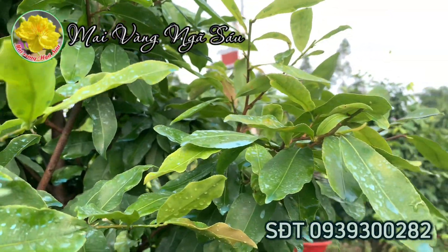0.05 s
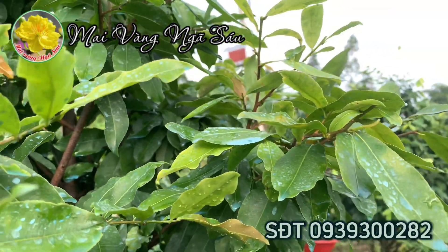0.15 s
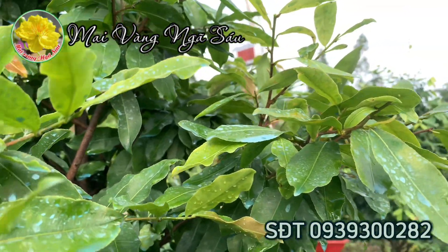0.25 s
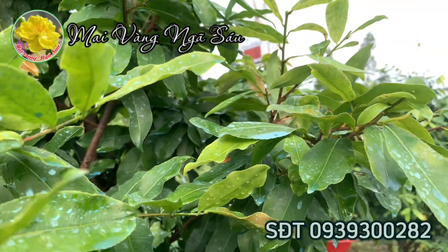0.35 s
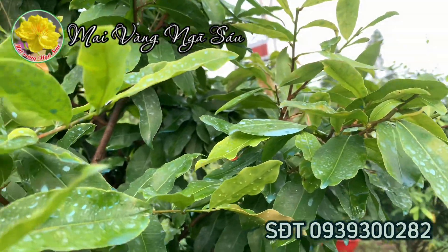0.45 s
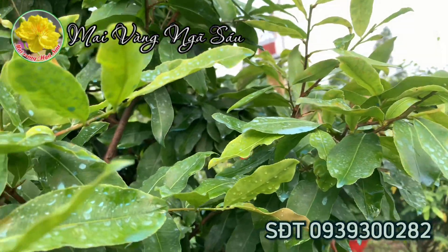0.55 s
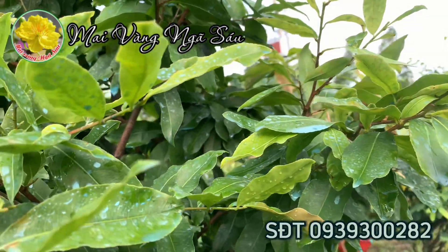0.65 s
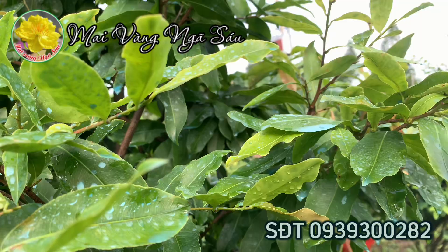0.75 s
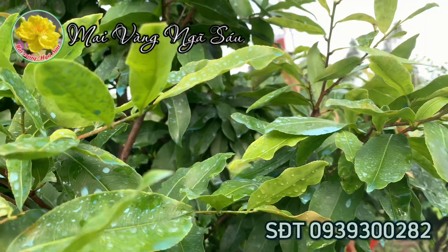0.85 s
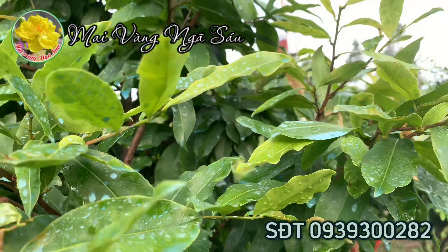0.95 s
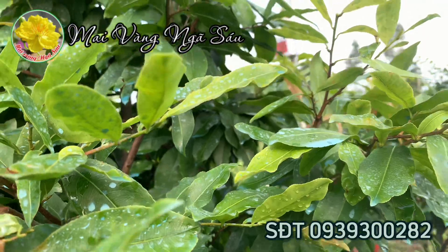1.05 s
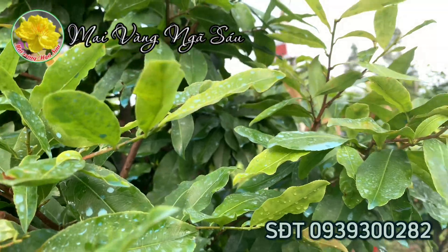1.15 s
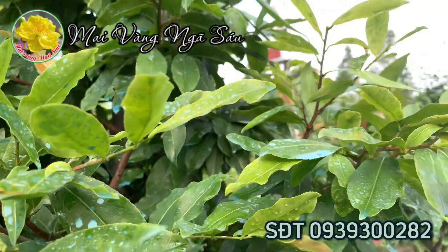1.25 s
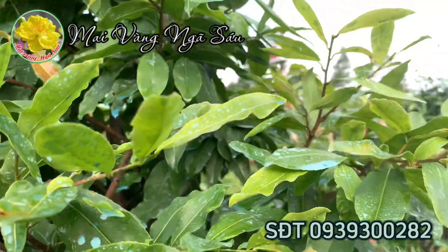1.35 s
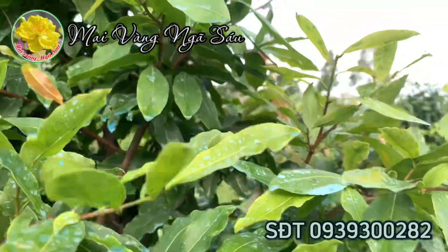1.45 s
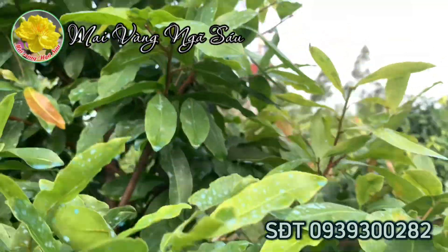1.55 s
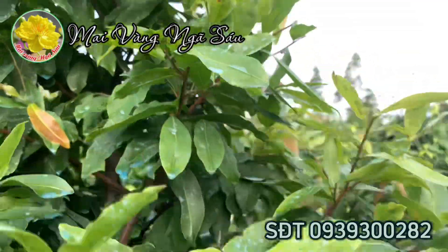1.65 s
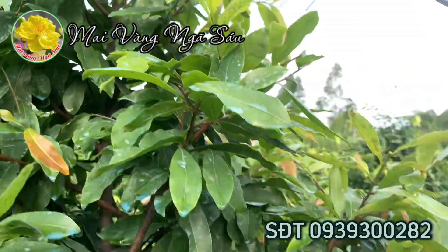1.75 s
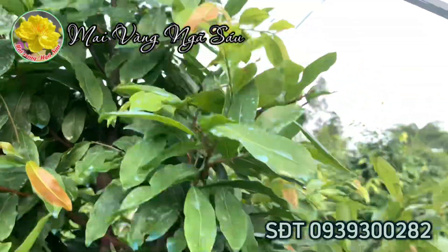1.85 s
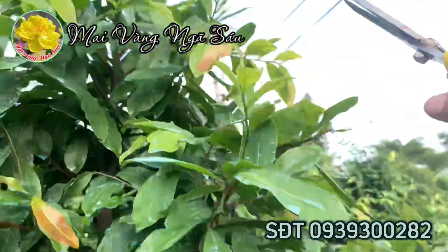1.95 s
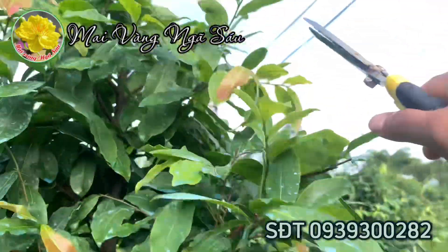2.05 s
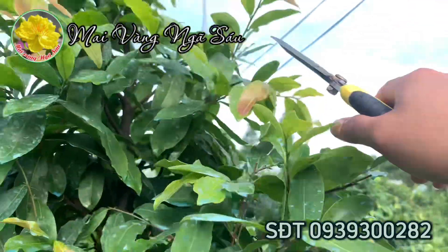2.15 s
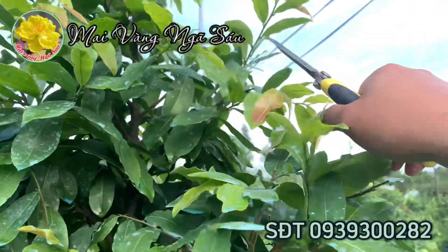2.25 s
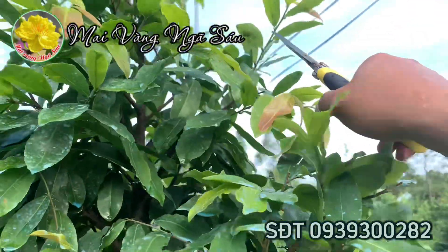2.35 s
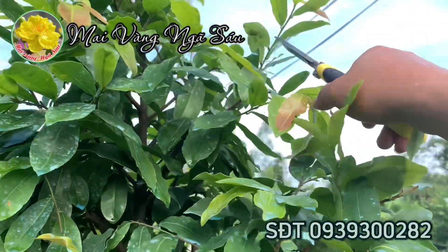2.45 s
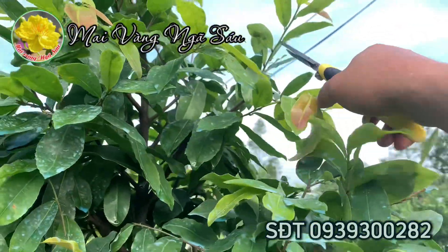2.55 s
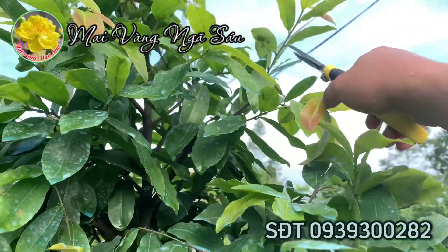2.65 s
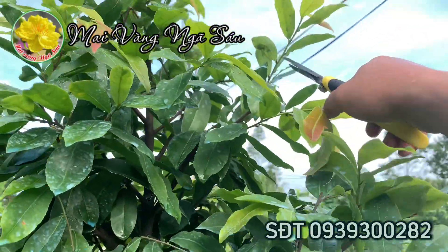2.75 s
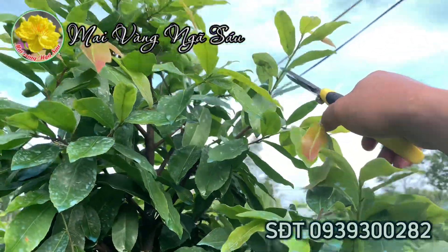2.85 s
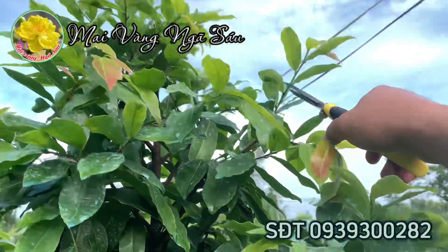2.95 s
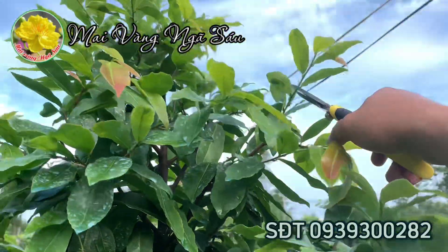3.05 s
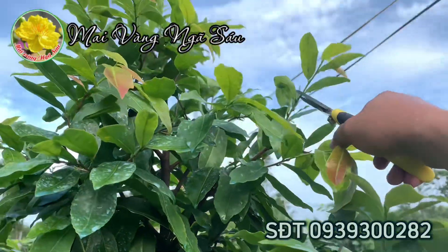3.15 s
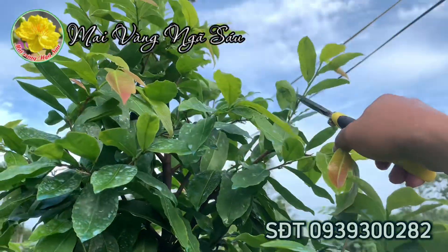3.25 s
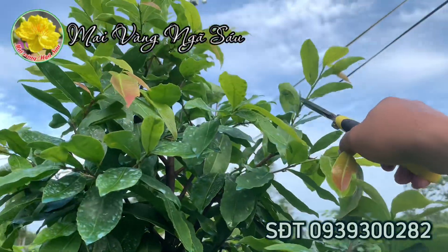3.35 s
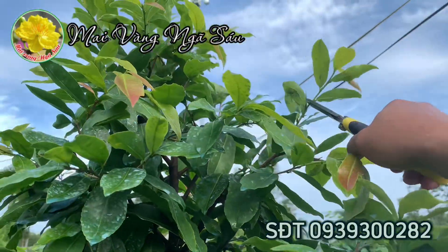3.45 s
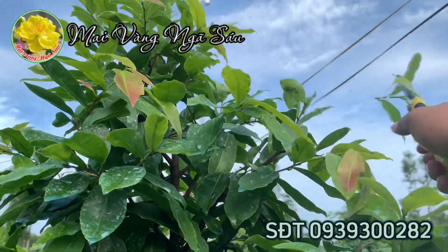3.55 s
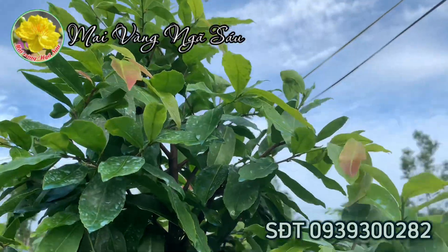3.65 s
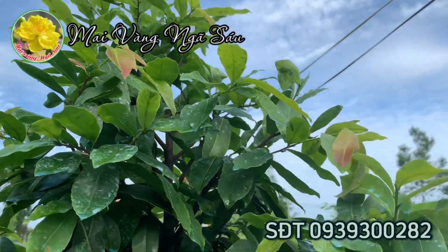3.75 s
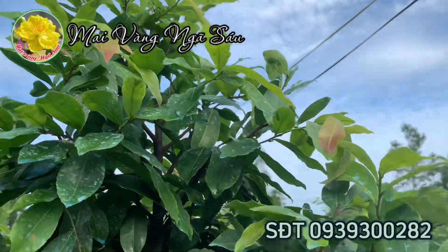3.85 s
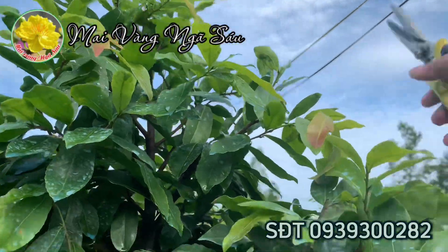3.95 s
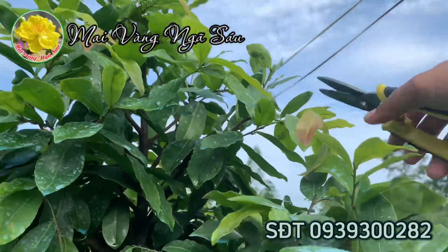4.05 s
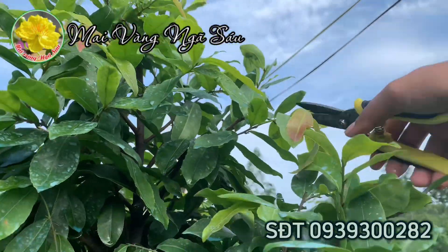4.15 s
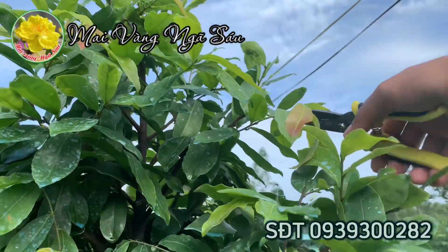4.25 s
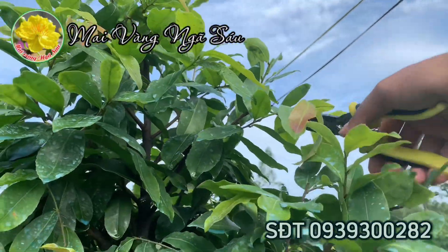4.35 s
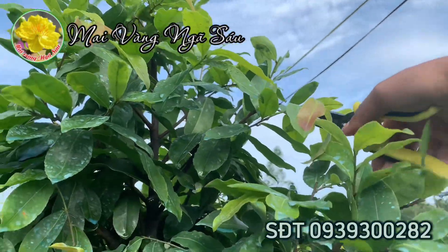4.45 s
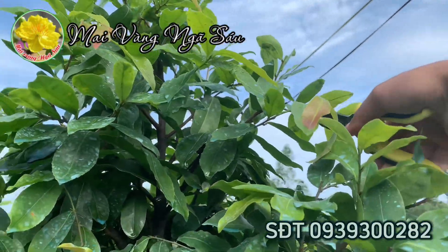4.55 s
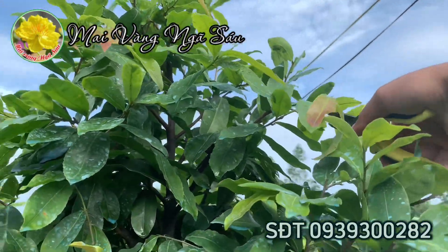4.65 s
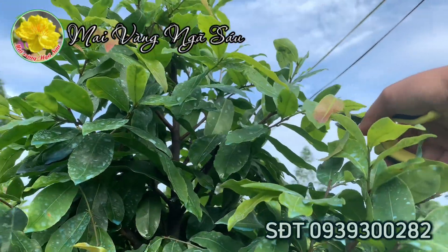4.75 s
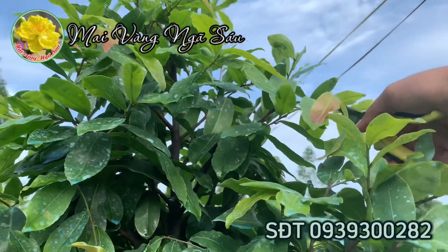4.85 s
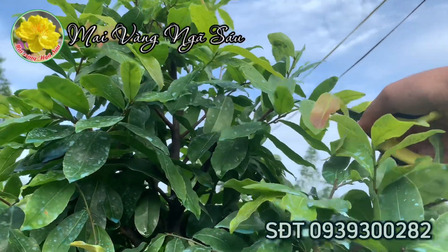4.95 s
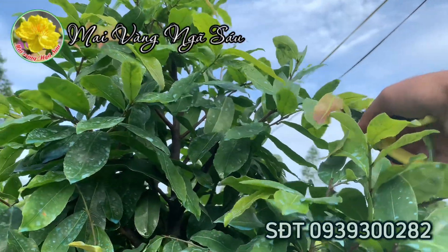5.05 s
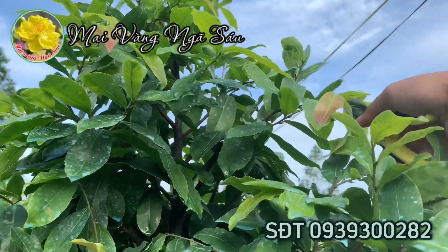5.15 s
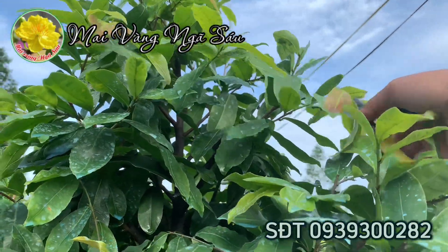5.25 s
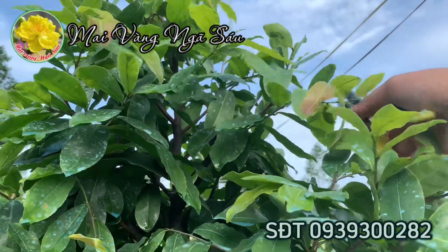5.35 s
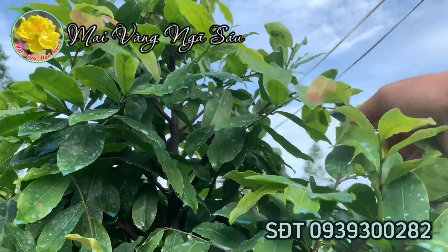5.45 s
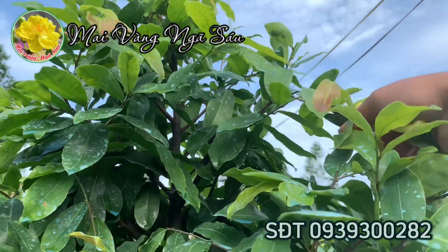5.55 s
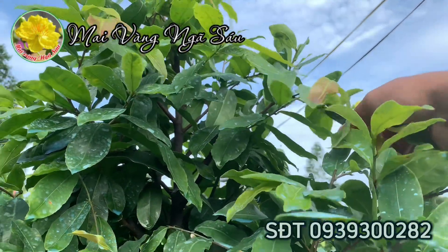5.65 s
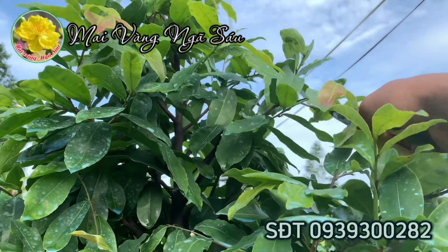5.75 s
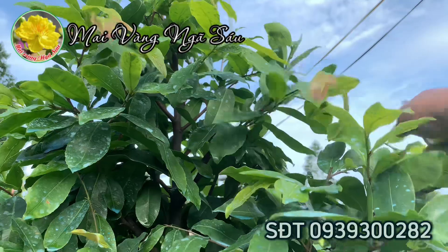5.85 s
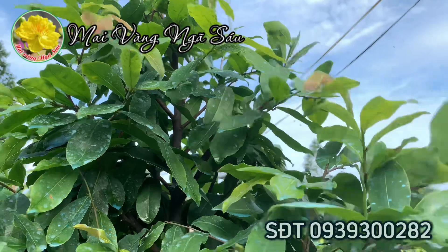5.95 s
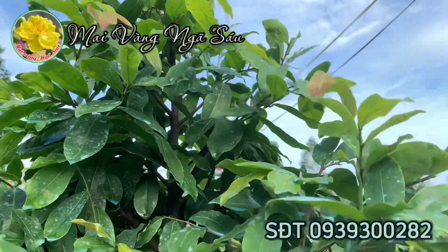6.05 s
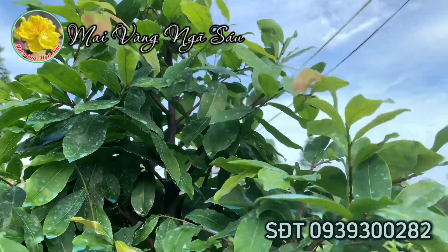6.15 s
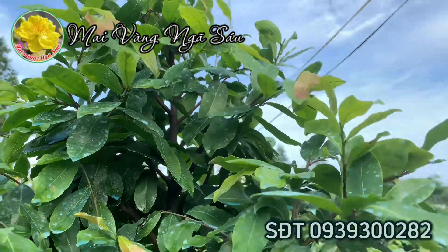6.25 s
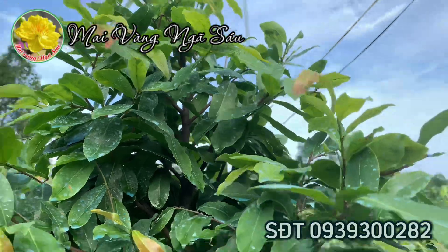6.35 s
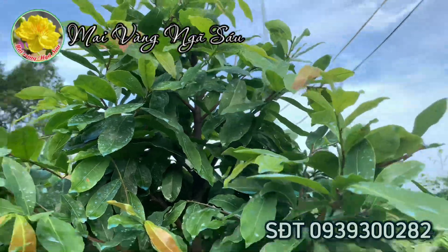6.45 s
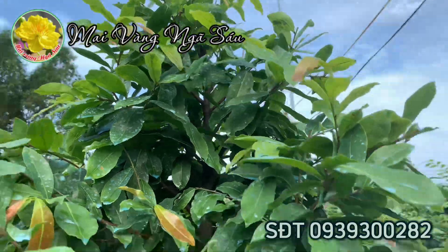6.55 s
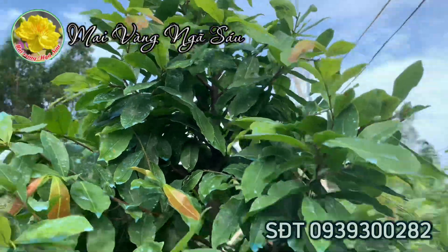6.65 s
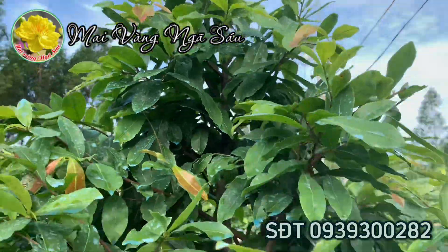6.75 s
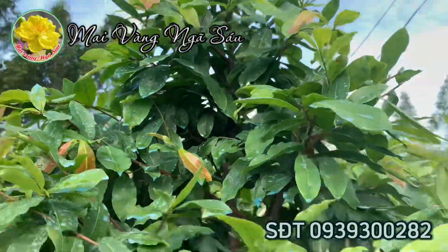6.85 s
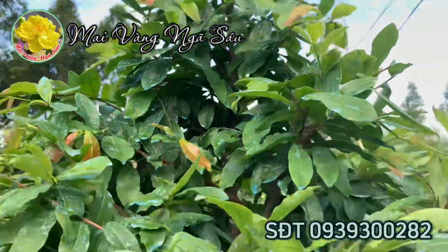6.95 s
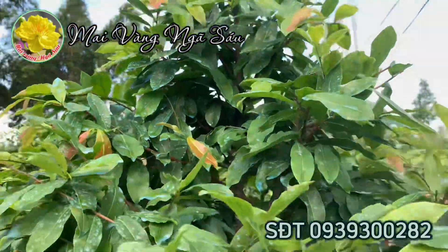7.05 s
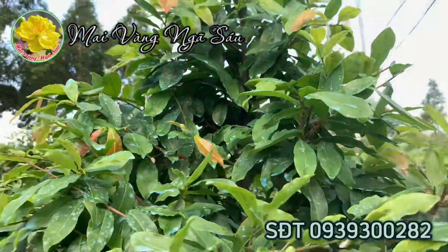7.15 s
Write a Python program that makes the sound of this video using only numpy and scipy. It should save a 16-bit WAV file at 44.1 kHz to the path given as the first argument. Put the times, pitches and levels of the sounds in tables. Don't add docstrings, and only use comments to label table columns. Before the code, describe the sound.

An open garden heard through a hand-held phone close to a tree. A shrill cicada, around six kilohertz, buzzes throughout, uneven at first, then fluttering about 23 times a second and swelling now and again; distant insects hiss and faint traffic rumbles low. At 0.5 s comes a faint snip and leaf brush, with soft low thuds at 0.9 and 1.1. Leaves rustle from 1.5 to 2.6, with a hard short bump at 1.8 and small ticks. A faint far frog throbs near 2.0, 2.8, 3.7 and 6.8. At 3.47 a loud, dry steel snip clacks shut with a tiny rattle. Crisp ticks return at 4.4. From 4.8 to 5.4 fingers rub and catch on the phone case, hollow and woody; the handle spring sings thinly before a second, softer snip at 5.78. Bumps, rustling and ticks follow, with a low thud at 6.65, twig knocks and bright snaps near 6.9.

```python
import sys
import numpy as np
from scipy import signal
from scipy.fft import rfft, irfft
from scipy.io import wavfile
from scipy.ndimage import uniform_filter1d, map_coordinates

SR = 44100
rng = np.random.default_rng(int(sys.argv[2]) if len(sys.argv) > 2 else 0)


def how_loud(loudness_db):
    steps = np.asarray(loudness_db, float) / 20
    return 10 ** steps


def generate_wav(signal):
    frames = np.transpose(np.atleast_2d(signal))
    scaled = np.clip(frames, -1, 1) * 32767
    pcm = np.round(scaled).astype(np.int16)
    wavfile.write(sys.argv[1], SR, pcm)


N = 316638
PORT_TURN_HZ = 5500


def evened(x):
    return x / np.sqrt(np.mean(x ** 2) + 1e-20)


def read(points, hz):
    f, value = np.transpose(points)
    return np.interp(np.log(hz + 1), np.log(f + 1), value, left=-90, right=-90)


def curves(rows, t):
    s, *columns = np.transpose(rows)
    return [np.interp(t, s, c) for c in columns]


def held(t, start, length, edge):
    inside = np.minimum(t - start, start + length - t)
    return np.sin(np.pi / 2 * np.clip(inside / edge + .5, 0, 1)) ** 2


def add(mix, s, sound):
    part = mix[..., round(s * SR):][..., :sound.shape[-1]]
    part += sound[..., :part.shape[-1]]


def drift(rate_hz, size):
    steps = rng.standard_normal(int(size * rate_hz / SR) + 4)
    coarse = np.arange(0, size + 32, 32)
    smooth = map_coordinates(steps, [coarse * rate_hz / SR], order=3)
    return evened(np.interp(np.arange(size), coarse, smooth))


def ring(x, hz, width):
    return signal.lfilter(*signal.iirpeak(hz, hz / width, SR), x)


def colour(x, points):
    hz = np.fft.rfftfreq(x.shape[-1], 1 / SR)
    return irfft(rfft(x) * how_loud(read(points, hz)), x.shape[-1])


def hollow(events, rise, sag):
    out, t = np.zeros(N), np.arange(SR // 2) / SR
    for s, db, hz, t60 in events:
        turn = 2 * np.pi * np.cumsum(hz * (1 + sag * np.exp(-t / 0.016))) / SR
        decay = how_loud(db - 60 * t / t60) * (1 - np.exp(-t / rise))
        add(out, s, np.sqrt(2) * decay * np.sin(turn))
    return out


# f/Hz, in phase, a quarter turn late
SIDE_LIKENESS = [(0, 0, .85), (600, 0, .65), (1500, -.1, .12), (4300, -.6, .1), (6500, -.5, .3),
                 (8000, 0, .5), (12000, 0, .55), (15000, -.1, .3)]


def likeness(hz, near=False):
    in_phase, quarter = curves(SIDE_LIKENESS, hz)
    like = in_phase - 1j * quarter * np.tanh(4 * np.sin(2 * np.pi * (hz + 300) / PORT_TURN_HZ))
    return .85 * like / np.hypot(in_phase, quarter) if near else like


def ports(mid, own, points):
    hz = np.fft.rfftfreq(len(mid), 1 / SR)
    side = likeness(hz, near=True) * rfft(mid) + .5 * rfft(own)
    side = irfft(side * how_loud(read(points, hz)), len(mid))
    return np.array([mid + side, mid - side])


def wash(spectra, side_db, patch_db, flicker_db, size):
    frames, hz = 4 * N // size + 5, np.fft.rfftfreq(size, 1 / SR)
    a, b, c, d, patches = rng.standard_normal((frames, len(hz), 5)).T
    patches = uniform_filter1d(uniform_filter1d(patches, size=10, axis=0), size=10, axis=1)
    patches = evened(patches)
    flicker = evened(uniform_filter1d(patches.mean(0), size=2))
    field = how_loud(patch_db * patches + flicker_db * flicker)
    like = likeness(hz)[:, None]
    shared, own = a + 1j * b, c + 1j * d
    z = np.array([shared, like * shared + np.sqrt(1 - abs(like) ** 2) * own])
    z = z * field * how_loud([read(s, hz) for s in spectra])[..., None]
    mid, side = signal.istft(z, nperseg=size, noverlap=3 * size // 4)[1][:, :N]
    mid, side = evened(mid), how_loud(side_db) * evened(side)
    return np.array([mid + side, mid - side])


# t/s, level/dB of the tenth overtone, level/dB of the eleventh over the tenth
CICADA_EFFORT = [(0, -58, -5), (.53, -65, 9), (.9, -62, -2.5), (1.15, -64.5, 9), (1.5, -65, 2),
                 (1.66, -58, -4), (2.05, -51.5, -10), (2.3, -57.5, -3.5), (3.42, -58.5, -3), (3.57, -52, 0),
                 (4.0, -55, 1.5), (4.4, -62, -3.5), (5.4, -57.5, -11), (5.76, -62, 0.5), (6.05, -53, -10.5),
                 (6.65, -60, 6), (6.84, -56.5, -10.5), (7.18, -60.5, -0.5)]
# overtone, level/dB, share of the effort it follows
FAINT_OVERTONES = [(9, -75.5, .4), (12, -75, .9), (13, -84, 1.3), (15, -84, 1.3), (16, -83, 1.1),
                   (17, -77, .6), (20, -86, 1.1)]
# t/s, length/s
HIGH_OVERTONE_DIPS = [
    (.6, .42),
    (2.78, .7),
    (5.22, .7),
]
# t/s, length/s, level/dB
NINTH_OVERTONE_SWELLS = [
    (1.94, 0.31, 5.5),
    (3.65, 0.86, 2),
    (5.45, 0.15, 8),
]
# f/Hz, level/dB
UNEVEN_COLOUR = [(5200, -8), (5600, -5), (5750, 0), (7300, -2), (7700, -20), (8700, -24), (9900, -22),
                 (10120, -7), (10300, -24), (11900, -28), (12200, -21), (12500, -30)]


def cicada():
    t = np.arange(N) / SR
    db, lean_db = curves(CICADA_EFFORT, t)
    settled = np.clip((t - .45) / .35, 0, 1)
    throb = 2 * np.pi * np.cumsum(23.5 + 3.5 * drift(10, N)) / SR
    clicks_per_s = 604
    rate = clicks_per_s + .45 * t + .085 * t ** 2
    turn = 2 * np.pi * np.cumsum(rate) / SR
    turn += settled * (.1 * np.sin(throb) + .04 * np.sin(2 * throb + 1.2) + .035 * drift(40, N))

    dip_db = -14 * sum(held(t, s, length, 0.089) for s, length in HIGH_OVERTONE_DIPS)
    ninth_db = sum(swell_db * held(t, s, length, 0.055) for s, length, swell_db in NINTH_OVERTONE_SWELLS)
    lines = [(10, db), (11, db + lean_db)]
    for k, level_db, share in FAINT_OVERTONES:
        line_db = level_db + share * (db - db.mean())
        lines.append((k, line_db + (k > 14) * dip_db + (k == 9) * ninth_db))

    limp_db = -63
    quarter = limp_db - 250 * np.maximum(t - .42, 0) ** 2
    half = np.maximum(quarter, -76)
    belly_hz = np.minimum(5950 + 1900 * t, 6650)
    for k in range(35, 84):
        if k % 4 == 0 or 50 < k < 57 or 69 < k < 78:
            continue
        if k < 55:
            loss_db = 7 * ((k * 151 - belly_hz) / 600) ** 2
        else:
            loss_db = 4 * (limp_db - quarter)
        lines.append((k / 4, (quarter if k % 2 else half) + read(UNEVEN_COLOUR, k * 151) - loss_db))

    out, veer = np.zeros((2, N)), .35 * drift(2, N)
    for k, line_db in lines:
        start, lag = rng.uniform(0, 2 * np.pi, 2)
        beat = np.sin(throb + start) + 0.42 * np.sin(2 * throb + lag)
        swell = 1 + settled * (0.33 + 0.13 * drift(5, N)) * beat
        shared_db = 1.66 * drift(45, N) + 3.0 * (k not in (10, 11)) * drift(3.01, N)
        own_db = 1.36 * np.array([drift(16, N), drift(12, N)])
        fade = how_loud(settled * shared_db + own_db)
        balance = how_loud(np.array([[-3.], [2.5]]) * (k < 12.5))
        delay = np.array([2 * np.pi * k * clicks_per_s / PORT_TURN_HZ + veer, 0 * veer])
        out += how_loud(line_db) * swell * fade * balance * np.cos(k * turn + start - delay)
    out += .35 * drift(5, N) * np.pad(out, ((0, 0), (830, 0)))[:, :N]
    return np.sqrt(2) * out


# f/Hz, level/dB
CHORUS_COLOUR = [(5000, -22), (5600, -13), (6300, -7), (6800, -3), (7100, 0), (7450, -2), (7560, -7),
                 (7690, -40)]


def insect_chorus():
    eleventh_db = sum(curves(CICADA_EFFORT, np.arange(N) / SR))
    db = -64.5 + 0.15 * (eleventh_db - eleventh_db.mean())
    return how_loud(db) * wash((CHORUS_COLOUR, CHORUS_COLOUR), -1.3, 1.0, 0.5, size=512)


# f/Hz, level/dB
RUMBLE_COLOUR = [
    [(18, -35.5), (30, -22), (40, -9), (53, 4.5), (75, -4.5), (108, 0.5), (161, -6.5), (210, -22), (270, -49.5), (460, -120)],
    [(18, -32), (30, -5.5), (54, 3.5), (81, -2.5), (161, -7), (210, -26), (270, -53), (460, -120)],
]
# f/Hz, level/dB
AIR_COLOUR = [
    [(110, -13), (180, -6), (220, -9), (272, 1.5), (404, -3.5), (944, -14.5), (1030, -10), (1090, -18.5), (1800, -27.5), (2340, -32.5), (3960, -120)],
    [(110, -38), (180, -6.5), (524, -7.5), (991, -5), (1250, -13), (1800, -23), (2340, -36), (3960, -120)],
]


def rumble_and_air():
    t = np.arange(N) / SR
    shaded = held(t, 5.46, 6.65 - 5.46, 0.044)
    rumble_db = -46.5 - 0.2 * t - 4 * shaded
    air_db = -60 - 3.5 * shaded
    rumble = how_loud(rumble_db) * wash(RUMBLE_COLOUR, -11.5, 1.5, 1.0, size=4096)
    return rumble + how_loud(air_db) * wash(AIR_COLOUR, -5, 2.35, 0.62, size=1024)


# t/s, length/s, dull rustle level/dB, bright over dull level/dB
LEAF_BRUSHES = [(0, 0.81, -81.5, 0.5), (0.474, 0.11, -69, 0.5), (0.99, 0.36, -80, -1),
                (1.505, 0.54, -69.5, -3.5), (1.886, 0.4, -64.5, -1), (2.326, 0.3, -69.5, 5),
                (3.515, 0.44, -83.5, 15), (4.307, 0.21, -75, -1), (4.5, 0.58, -76, 4),
                (5.2, 0.21, -71, 0.5), (5.409, 0.22, -64.5, -10), (5.736, 0.24, -59.5, -2),
                (6.0, 0.27, -70, 0), (6.357, 0.35, -63.5, -3.5), (6.879, 0.43, -67.5, 0.5)]
# f/Hz, level/dB
DULL_RUSTLE = [
    [(710, -5), (1200, -2), (1830, -5.5), (2140, -5.5), (3470, -10), (4070, -7.5), (5200, -9), (6760, -26.5), (11400, -120)],
    [(710, -35), (1200, 1), (1470, -10.5), (1900, -5), (2160, -9), (5200, -10), (6760, -25), (11400, -120)],
]
# f/Hz, level/dB
BRIGHT_RUSTLE = [
    [(7900, -34), (8800, -36), (9100, -19), (9450, -19), (9650, -3), (10200, 0), (11000, -3), (12200, 0), (12900, -5), (13250, -32), (13700, -30), (14000, -13), (14450, -13), (14800, -30), (15300, -50)],
    [(4710, -35), (7500, -14), (8100, -14), (8400, -2), (9000, 0), (10200, -5), (10450, -40), (11500, -40), (11750, -4), (13300, 0), (14300, -5), (14700, -30), (16000, -56)],
]


def leaves():
    t = np.arange(N) / SR
    dull, bright = np.full(N, how_loud(2 * -73)), np.full(N, how_loud(2 * -78))
    for s, length, db, bright_db in LEAF_BRUSHES:
        stroke = held(t, s, length, 0.22)
        dull += how_loud(2 * db) * stroke
        bright += how_loud(2 * (db + bright_db)) * stroke
    body = np.sqrt(dull) * wash(DULL_RUSTLE, 0.059, 2.5, 0.82, size=512)
    return body + np.sqrt(bright) * wash(BRIGHT_RUSTLE, 3.0, 3.0, 1.3, size=512)


# t/s, length/s, f/Hz, width/Hz, level/dB
FAR_WHISTLES = [
    (-.0, 0.291, 3410, 30, -78.5),
    (-.0, 0.329, 3900, 30, -78),
    (0.491, 1.301, 1960, 100, -76),
]
# t/s, length/s, f/Hz, width/Hz, level/dB
HANDLE_SPRING = [
    (5.42, .32, 5060, 130, -66),
    (5.36, .48, 4000, 240, -68.5),
    (5.3, .5, 2480, 260, -71.5),
    (5.24, .2, 4400, 1200, -67),
]


def whistles():
    out = np.zeros((2, N))
    for s, length, hz, width, db in FAR_WHISTLES + HANDLE_SPRING:
        noise = rng.standard_normal((2, int(length * SR)))
        tone = evened(ring(ring(noise, hz, width), hz, width))
        add(out, s, np.sqrt(2) * how_loud(db) * tone * signal.windows.tukey(noise.shape[1], .4))
    return out


# t/s blades meet, clack level/dB, shear before/s, shear rel level/dB, rattle/s, rattle rel level/dB
SNIP_EVENTS = [
    (3.4698, -14.0, .0072, -21, .0046, -12),
    (5.779, -18.5, .012, -21, .009, -22),
    (.4813, -36, .0095, -14, .006, -8),
]
# f/Hz, level/dB
BLADE_COLOURS = [
    [(210, -50), (350, -23), (1440, -22), (2050, -3), (4230, -3), (5300, -2), (5940, -11), (6860, -5.5),
     (8730, -21.5), (10100, 4), (11300, -8.5), (12200, 2.5), (13300, -12), (14600, -7.5), (16400, -57)],
    [(410, -53), (700, -27), (973, -22.5), (1590, -7), (2060, -17), (2510, -10), (3500, -19.5), (4800, -9),
     (5850, -16), (6940, -11), (8570, -29.5), (10400, -4), (12200, -2.5), (13300, -19), (14700, -19),
     (16400, -42.5)],
    [(290, -27), (500, 0.5), (1030, -22), (1550, -4), (2130, -15), (3390, -6), (4150, 0.5), (5240, -8),
     (7980, -5), (8830, -21), (10200, -1), (12100, -0.5), (14000, -11), (16000, -69)],
]
# f/Hz, side over mid level/dB
SNIP_PORTS = [
    [(60, -15), (200, -16), (700, -6), (1290, -7), (2380, -12), (4400, -7), (6400, -1.5)],
    [(60, -15), (300, -13), (700, -3), (1290, -5), (2380, -9), (4400, -1), (6400, 0)],
    [(60, -16), (150, -11), (300, -6), (700, 2), (1290, 2), (2380, 9), (4400, -6), (6400, -5)],
]
# f/Hz, side over mid level/dB
UPPER_PORT_COMB = [(7300, 2), (8500, 16), (9700, -3), (10900, -25), (12000, 1), (13000, 9), (14200, 13),
                   (15000, -6), (16500, -4)]


def snips():
    out, t = np.zeros((2, N)), np.arange(-2048, 6144) / SR
    after = t > 0
    for event, blades, side in zip(SNIP_EVENTS, BLADE_COLOURS, SNIP_PORTS):
        s, db, lead, lead_db, tail, tail_db = event
        bite = np.clip((t + lead) / (.25 * lead), 0, 1) ** 2 * (t < 0)
        shear = how_loud(lead_db) * bite * (.4 + np.exp(-((t + .55 * lead) / (.22 * lead)) ** 2))
        clack = np.exp(-(t / np.where(t < 0, .0006, .0008)) ** 2)
        bounces = 1 + .6 * np.cos(2 * np.pi * t / .0013)
        rattle = how_loud(tail_db) * after * bounces * how_loud(-5 * t / tail)
        rattle = rattle / (1 + np.exp((t - tail) / .0006))
        rattle += (how_loud(-24 - 2200 * t) + how_loud(-43 - 130 * t)) * after
        shape = shear + clack + rattle
        blow = 3.5 * (t == 0)
        z = rfft(rng.standard_normal((2, len(t))) * shape + blow)
        z /= np.sqrt(uniform_filter1d(abs(z) ** 2, size=60))
        near, own = colour(irfft(z), blades)
        size = np.sqrt(np.sum(near ** 2) / np.sum(shape ** 2))
        add(out, s + t[0], how_loud(db) / size * ports(near, own, side + UPPER_PORT_COMB))
    return out


# t/s, bright peak level/dB, dull rel level/dB
LEAF_TICKS = [(0.546, -58, -1), (1.3213, -57.5, -13), (1.923, -61, 10), (2.046, -55, 2), (2.43, -55, -17),
              (2.694, -65, 5), (5.9865, -56, 5), (2.1156, -52.5, -5), (2.1691, -54, -16),
              (2.527, -48.5, -4.5), (2.593, -51.5, -8), (3.5153, -54, 2), (3.548, -58, -3),
              (4.357, -47.5, -12), (4.3784, -58, -13), (4.446, -44.5, -12), (4.76, -54, 4),
              (4.845, -54, -6), (4.9145, -53, -6), (5.0893, -67.5, 13), (5.274, -60.5, 11.5),
              (5.3466, -45, -6.5), (5.4246, -53, -5), (5.5146, -50.5, -10), (5.2895, -54, 0),
              (5.5406, -59, -4), (5.677, -53, -8), (5.69, -51, -3), (5.898, -53, -10), (5.9282, -66, -11),
              (5.959, -63, -9), (5.995, -52, -8), (5.8465, -52, -8), (5.857, -53, -10), (5.9785, -43, -0.5),
              (6.3387, -58, -6), (6.3866, -61, -12), (6.5278, -60, 3), (6.513, -60, 11), (6.605, -59, -2),
              (6.646, -56, -14), (6.7084, -56, -6), (6.8665, -68, -11), (6.887, -53, -14),
              (6.906, -47, -17), (6.9385, -44.5, -15), (6.9587, -43, -13)]
# f/Hz, level/dB
SNAP_COLOUR = [(6000, -13), (7600, -14.5), (8500, -21.5), (9300, -17), (9750, -7.5), (12200, -4.5),
               (13400, -22), (14300, -16), (16400, -40)]
# f/Hz, level/dB
TWIG_COLOUR = [(500, -16), (1200, -6.5), (2100, -4), (4000, -6.5), (5200, -2), (7400, -6.5), (8200, -35),
               (11000, -90)]


def ticks():
    out, t = np.zeros((2, N)), np.arange(-256, 1792) / SR
    shape = np.exp(np.minimum(t / 0.0006, 0) - np.maximum(t, 0) / 0.002)
    shape += 0.15 * (t > 0) * np.exp(-t / 0.025)
    rms = np.sqrt(np.mean(shape ** 2))
    for s, db, dull_db in LEAF_TICKS:
        puff = rng.standard_normal((2, len(t))) * shape
        bright, dull = (evened(colour(puff, c)) * rms for c in (SNAP_COLOUR, TWIG_COLOUR))
        near, own = bright + how_loud(dull_db) * dull
        add(out, s + t[0], how_loud(db - 0.4) * ports(near, own, SNIP_PORTS[1] + UPPER_PORT_COMB))
    return out


# t/s, peak level/dB, ring f/Hz, t60/s
BUMP_EVENTS = [
    (.897, -32.5, 55.5, 0.44),
    (1.128, -35, 53.1, 0.41),
    (1.803, -21, 63.4, 0.021),
    (5.435, -32, 107, 0.13),
    (5.768, -36, 201, 0.073),
    (5.778, -42, 306, .05),
    (5.908, -32.5, 107, 0.057),
    (5.945, -40.5, 153, 0.061),
    (6.003, -35, 102, 0.039),
    (6.652, -36.5, 58, 0.41),
]


def bumps():
    return hollow(BUMP_EVENTS, rise=0.0014, sag=0.24)


# t/s, peak level/dB, ring f/Hz, t60/s
TWIG_KNOCKS = [(1.1, -56, 770, 0.06), (1.492, -60, 1550, 0.073), (2.3, -51, 3160, 0.021),
               (2.8, -57, 2980, 0.027), (2.693, -55, 3500, 0.021), (5.8, -53, 700, 0.067),
               (5.424, -57, 2000, .04), (5.457, -58, 2400, .04), (6.838, -47.5, 1380, 0.027),
               (6.835, -48, 490, 0.045), (6.825, -67, 2100, 0.29), (7.04, -53, 1550, 0.1),
               (7.9, -42.5, 1500, 0.035), (7.064, -50, 1800, 0.033), (5.779, -44, 1540, .03)]


def knocks():
    return hollow(TWIG_KNOCKS, rise=0.00084, sag=0.047)


# t/s, length/s, level/dB
FROG_CALLS = [
    (2.039, 0.37, -62.5),
    (2.804, 0.54, -63.5),
    (3.715, 0.774, -64.5),
    (6.817, 0.29, -63.5),
]


def frog():
    out = np.zeros(N)
    for s, length, db in FROG_CALLS:
        t = np.arange(0, length, 1 / SR)
        beat = np.sin(2 * np.pi * np.cumsum(17 + 3. * drift(6.3, len(t))) / SR)
        beat = np.clip(.5 + beat, .3, 1)
        tone = np.sin(2 * np.pi * np.cumsum(1016 + 4.0 * drift(11.3, len(t))) / SR)
        fade = how_loud(db - 3 * t / length) * signal.windows.tukey(len(t), .3)
        add(out, s, fade * evened(beat * tone))
    return np.array([out, 0.37 * np.roll(out, 6)])


# t/s, length/s, pressure level/dB, upper ring rel level/dB
FINGER_RUBS = [
    (4.802, 0.15, -54.5, -27),
    (4.919, .12, -53, -6.5),
    (5.151, 0.12, -47.5, -5),
    (5.285, 0.18, -46, -5.5),
    (5.858, .11, -53, -7.5),
    (6.602, 0.39, -62, -2),
]
# f/Hz, width/Hz, level/dB
CASE_MODES = [
    [(273, 15, -5), (394, 97, 5), (478, 55, -6)],
    [(637, 73, 4), (790, 22, 2.5), (996, 33, -0.5)],
]


def rubs():
    t = np.arange(N) / SR
    slips = rng.standard_normal(N) * how_loud(3.1 * drift(90, N))
    low, high = (evened(sum(how_loud(g) * evened(ring(ring(slips, f, w), f, 3 * w)) for f, w, g in part))
                 for part in CASE_MODES)
    out = np.zeros(N)
    for s, length, db, upper_db in FINGER_RUBS:
        out += held(t, s, length, 0.062) * how_loud(db) * (low + how_loud(upper_db) * high)
    return out


# t/s, peak level/dB, ring f/Hz, t60/s
FINGER_CATCHES = [(4.812, -36.5, 385, 0.041), (4.972, -26.5, 398, 0.023), (5.133, -37.5, 758, 0.048),
                  (5.136, -39.5, 420, 0.071), (5.163, -32.5, 386, 0.15), (5.205, -32, 492, 0.049),
                  (5.385, -31, 478, 0.046), (5.922, -40, 985, 0.041), (4.83, -48, 255, 0.27),
                  (4.93, -52, 790, 0.082), (4.94, -43, 274, 0.095), (4.972, -48, 793, 0.055),
                  (5.17, -50, 799, 0.64), (5.225, -58, 808, 0.3), (5.205, -53, 1125, 0.04),
                  (5.18, -44, 650, .06), (5.322, -41, 396, 0.13), (5.345, -42, 497.7, 0.22),
                  (5.345, -45, 790, .08), (5.385, -40, 986, 0.042), (5.44, -39, 715, 0.05),
                  (5.868, -44.5, 454, 0.046), (5.872, -48, 1070, .04), (5.946, -45, 1080, 0.038)]


def catches():
    return hollow(FINGER_CATCHES, rise=0.0033, sag=0.05)


# f/Hz, side over mid level/dB
CASE_PORT_DIFFERENCE = [(20, -11.5), (60, -8), (150, -8), (320, -9.5), (650, 0), (1200, -1.5), (4000, -9)]


def scene():
    case = bumps() + knocks() + rubs() + catches()
    garden = cicada() + insect_chorus() + rumble_and_air() + leaves() + whistles() + frog()
    return garden + snips() + ticks() + ports(case, np.zeros(N), CASE_PORT_DIFFERENCE)


def low_pass(x):
    return signal.sosfilt(signal.butter(12, 16500, fs=SR, output="sos"), x)


# f/Hz, level/dB a bin
MUTE_LEVEL = [(1, -200), (2000, -118), (3300, -102), (4200, -104), (5000, -110), (7400, -110),
              (7700, -88.5), (9300, -100), (9700, -109), (12700, -107), (13200, -92), (13700, -94),
              (14000, -100), (14500, -100), (14900, -91), (22050, -99)]


def record(dry):
    dry = signal.sosfilt(signal.butter(3, 36, "high", fs=SR, output="sos"), dry)
    mid_side = np.array([dry[0] + dry[1], dry[0] - dry[1]]) / 2
    hz, _, z = signal.stft(mid_side, SR, nperseg=1024)
    bands = (abs(z[:, :512]) ** 2).reshape(2, 64, 8, -1).mean(2)
    level_db = 10 * np.log10(uniform_filter1d(bands, size=3, axis=2) + 1e-20)
    chance_db = 7.4 * evened(uniform_filter1d(rng.standard_normal(bands.shape), size=5, axis=2))
    heard = level_db + chance_db > read(MUTE_LEVEL, hz[4::8])[:, None]
    z[:, :512] *= np.repeat(heard, 8, axis=1)
    mid, side = signal.istft(z, SR, nperseg=1024)[1][:, :N]
    return low_pass(np.array([mid + side, mid - side]))


dry = scene()
out = record(dry)
generate_wav(out)
```